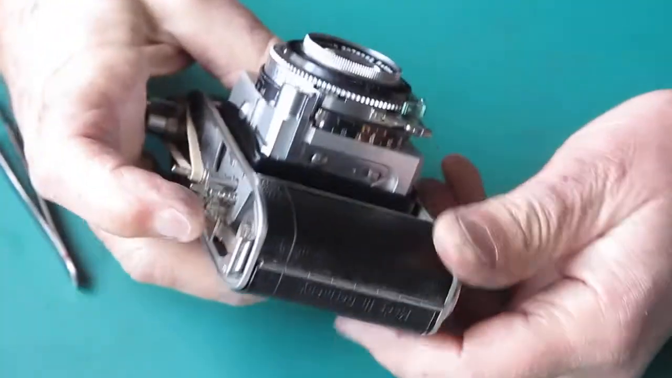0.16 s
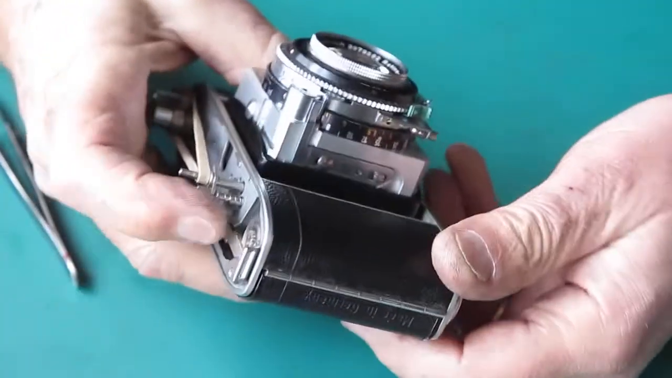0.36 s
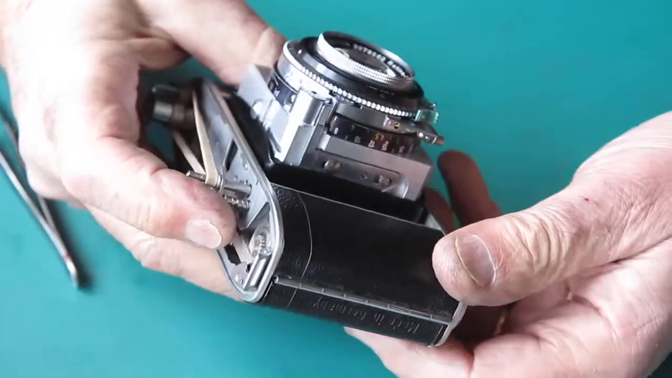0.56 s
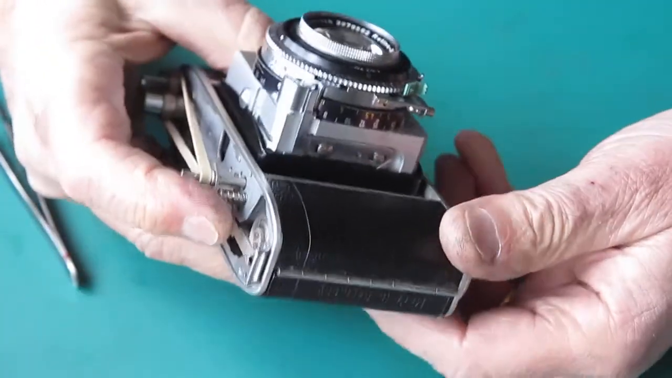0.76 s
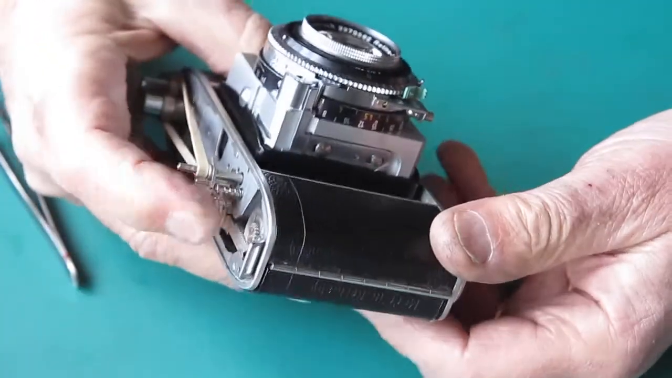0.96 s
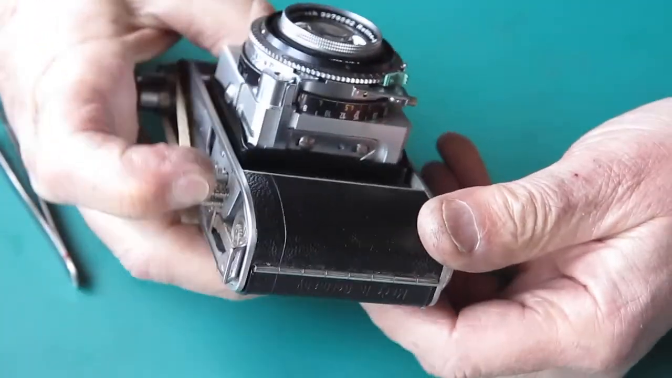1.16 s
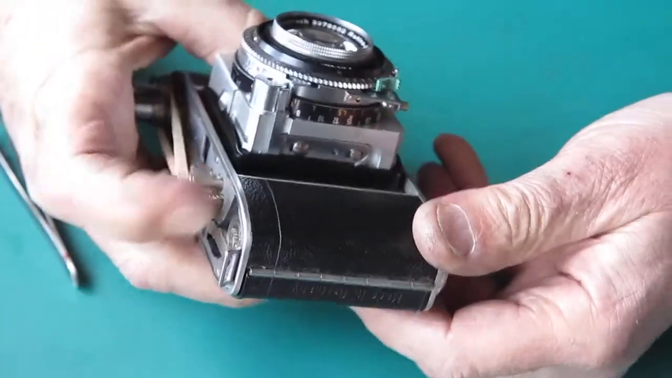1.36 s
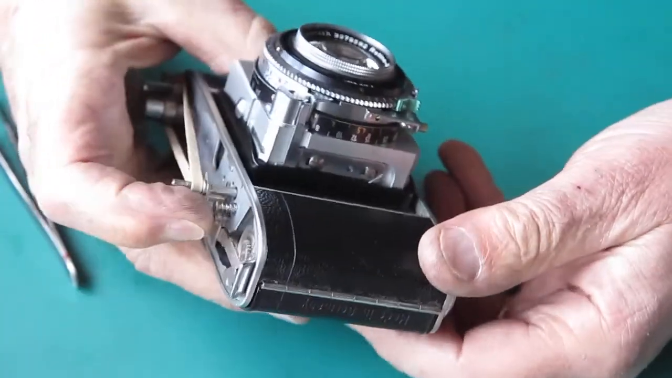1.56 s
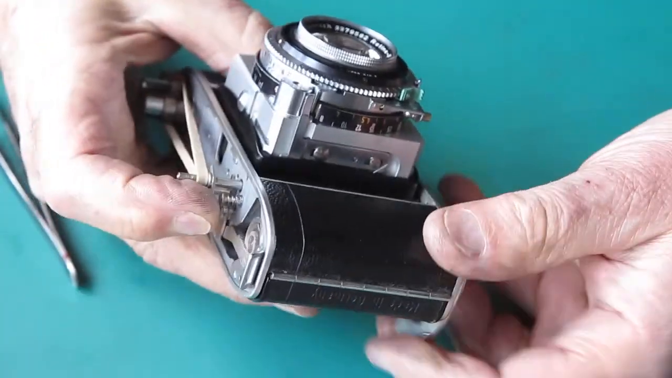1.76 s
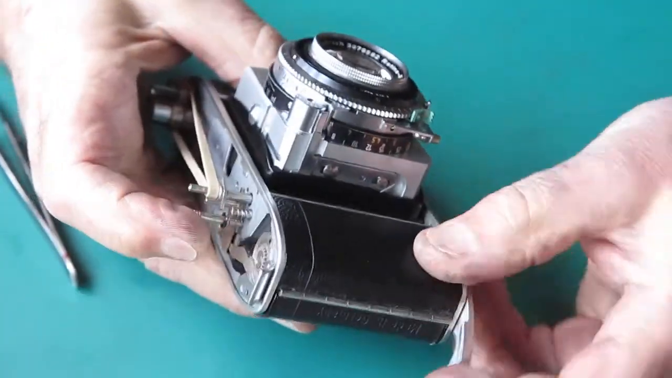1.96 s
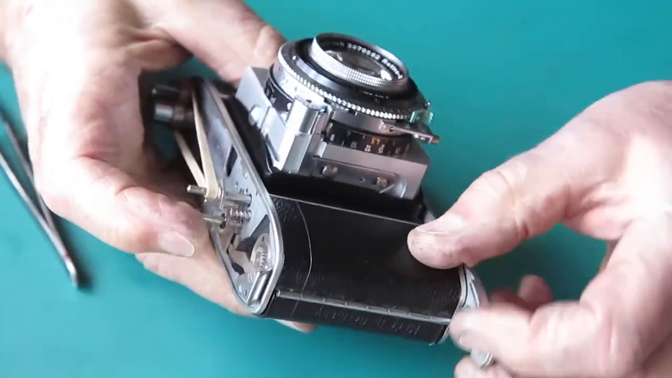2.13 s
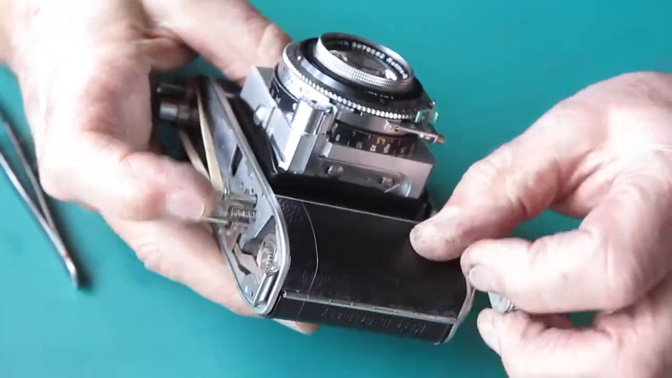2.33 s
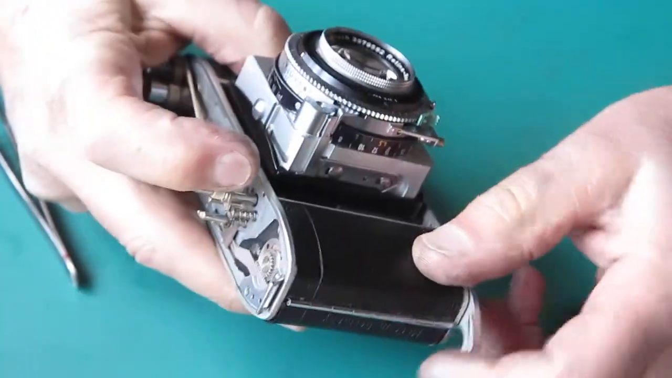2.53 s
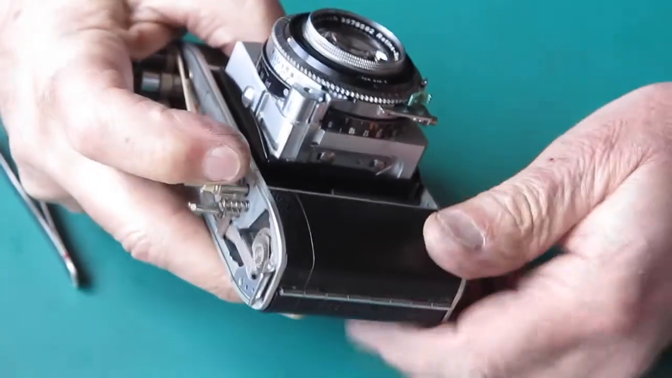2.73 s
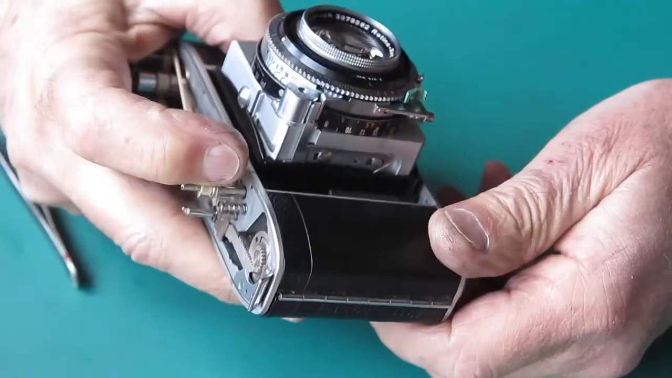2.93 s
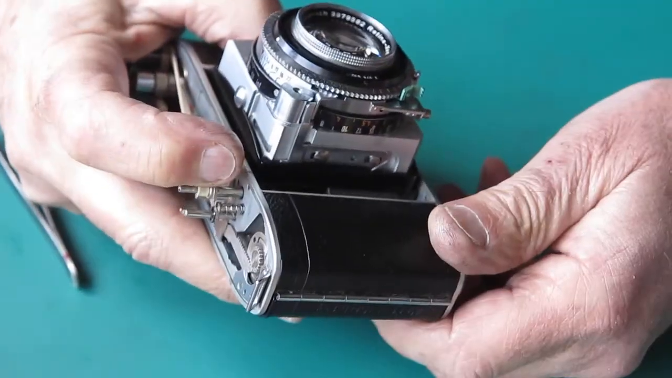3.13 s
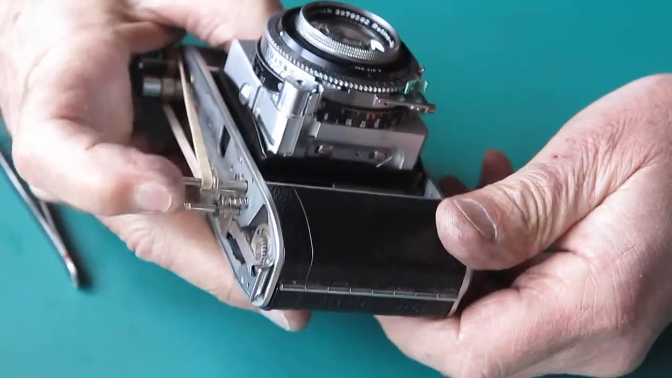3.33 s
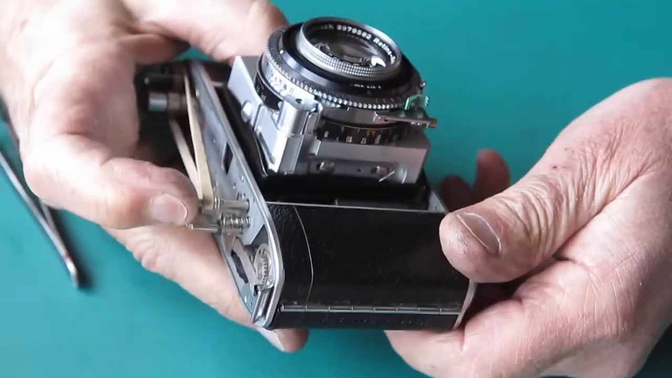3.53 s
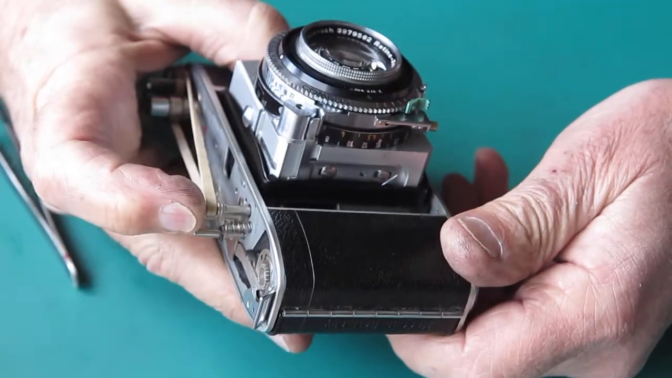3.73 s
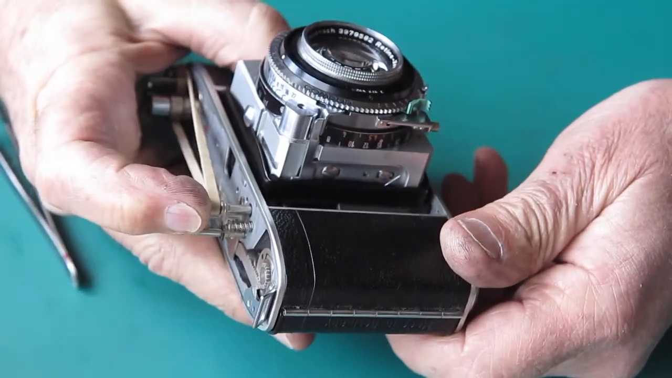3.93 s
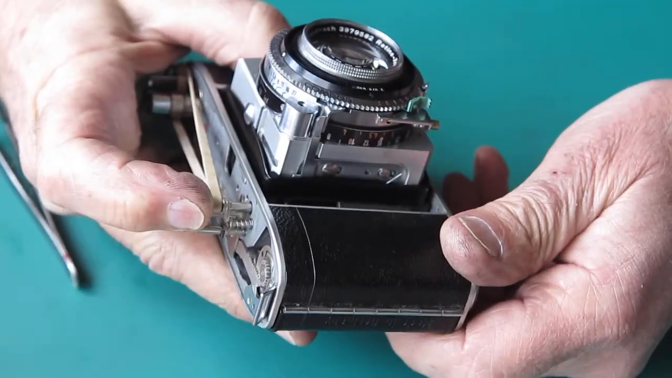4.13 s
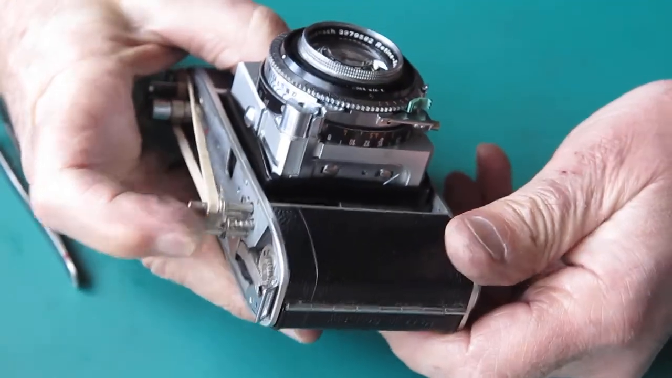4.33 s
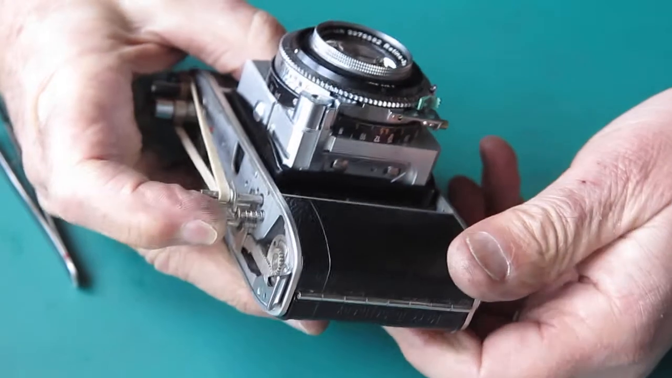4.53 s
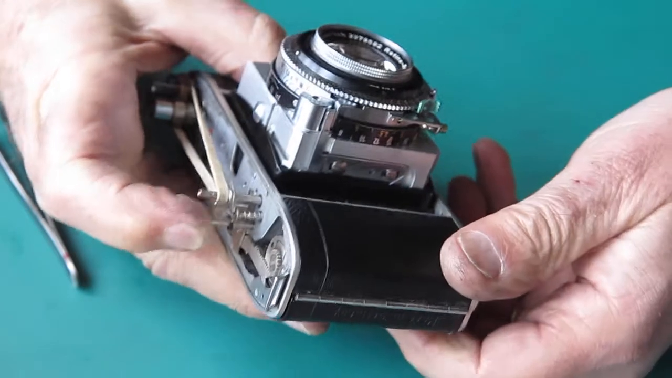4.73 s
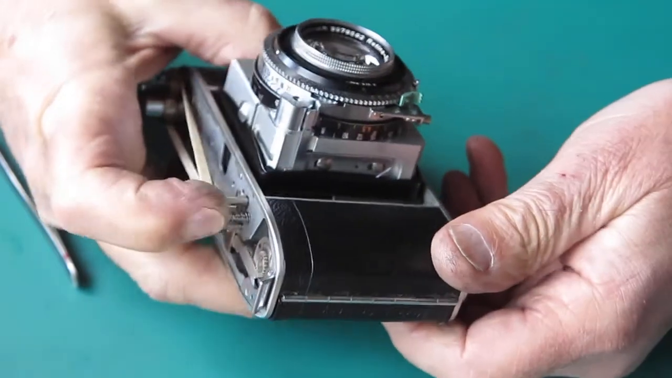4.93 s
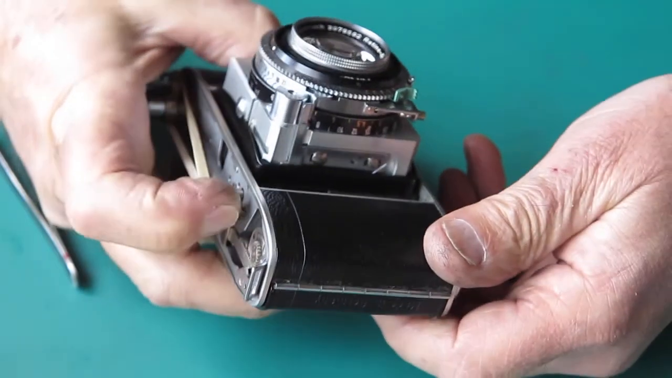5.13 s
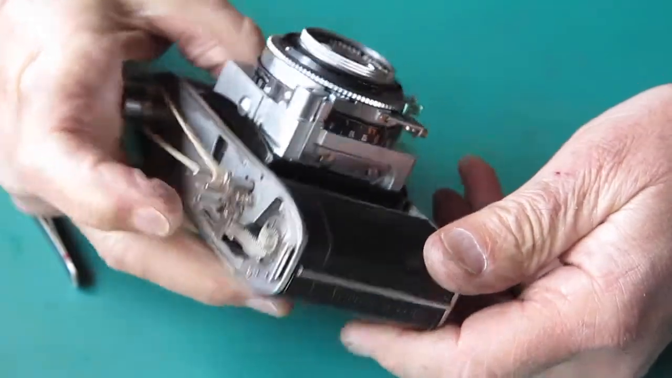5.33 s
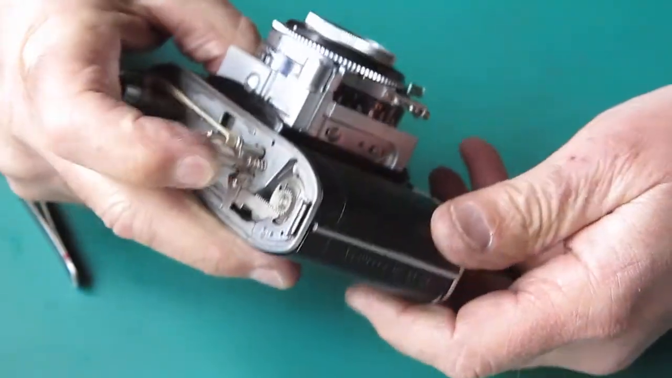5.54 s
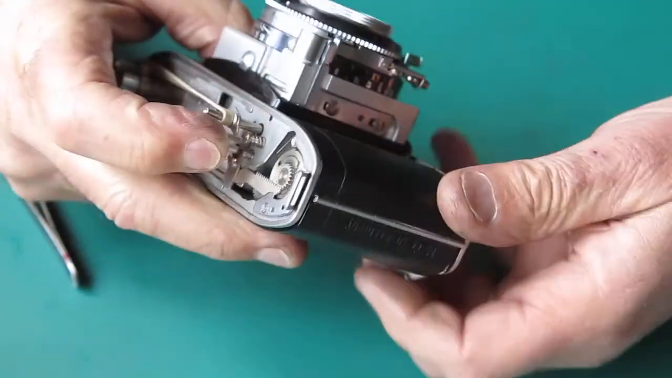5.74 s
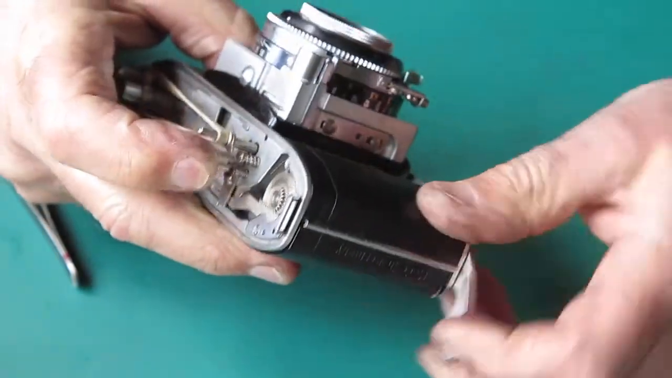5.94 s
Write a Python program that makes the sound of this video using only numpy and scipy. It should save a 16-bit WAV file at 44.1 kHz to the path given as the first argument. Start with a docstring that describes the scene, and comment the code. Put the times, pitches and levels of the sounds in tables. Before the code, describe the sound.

Small sharp metallic clicks and short ratcheting rasps as a camera's shutter and winding lever are worked by hand in a quiet room.

```python
"""A small damped room: a hand works a metal camera's release and winding lever, 0.5 m from a stereo mic. Pawls
and catches strike, bounce and ring the thin body; gears rasp while the lever turns; fingers knock the shell.
The room echoes briefly. Rumble, hum and hiss swell slowly and drop at the two loudest blows."""
import sys
import numpy as np
from scipy import signal
from scipy.fft import rfft, irfft
from scipy.io import wavfile
from scipy.ndimage import uniform_filter1d

SR = 44100
rng = np.random.default_rng(int(sys.argv[2]) if len(sys.argv) > 2 else 0)


def dump(signal):
    """Clip the signal to [-1, 1] and save it as 16-bit WAV at the path in sys.argv[1]."""
    limited = np.clip(np.atleast_2d(signal).T, -1, 1)
    pcm = np.round(limited * 32767).astype(np.int16)
    wavfile.write(sys.argv[1], SR, pcm)


N = 268791


def undb(db):
    return 10 ** (np.asarray(db) / 20)


def unit(x):
    return x / np.sqrt(np.mean(x ** 2))


def over_log_hz(points, hz):
    point_hz, values = np.transpose(points)
    return np.interp(np.log(np.maximum(hz, 1)), np.log(point_hz), values)


def over_time(points):
    return np.interp(np.arange(N) / SR, *np.transpose(points))


def band(x, hz, width_hz):
    return signal.lfilter(*signal.iirpeak(hz, hz / width_hz, fs=SR), x)


def steep_band(x, hz, width_hz):
    return band(band(x, hz, width_hz), hz, width_hz)


def smooth(x, ms):
    pole = np.exp(-1000 / (ms * SR))
    return signal.lfilter([1 - pole], [1, -pole], x)


def wander(rate_hz):
    """Random steps, slewed twice."""
    hold = int(SR / rate_hz)
    steps = np.repeat(rng.standard_normal(N // hold + 1), hold)
    return 0.7 * uniform_filter1d(uniform_filter1d(steps, hold), hold)[:N]


def add(out, at_s, x):
    i = int(at_s * SR)
    out[..., i:i + x.shape[-1]] += x[..., :N - i]


def minimum_phase(gain_db):
    """Unit-energy causal response for gains from 0 Hz to SR / 2."""
    cepstrum = irfft(gain_db * np.log(10) / 20)
    half = len(cepstrum) // 2
    cepstrum[1:half] *= 2
    cepstrum[half + 1:] = 0
    response = irfft(np.exp(rfft(cepstrum)))[:half]
    return response / np.sqrt(np.sum(response ** 2))


def air():
    """Flickering rumble and hiss, most alike left and right in the bass."""
    spectrum = [(13, -38), (22, -12.5), (132, -4), (211, -9), (278, -11), (398, -11), (554, -17),
                (910, -18), (988, -20.5), (1070, -17.5), (1710, -25), (7190, -29), (11500, -43),
                (14700, -58), (16000, -68)]  # (frequency [Hz], relative density [dB])
    balance = [(60, 1), (110, 7.5), (200, 1), (380, 1), (700, 1.5), (1290, 1.0), (2380, 0.5), (4400, 0.0),
               (8120, -1.5), (15000, 6)]  # (frequency [Hz], left minus right [dB])
    likeness = [(30, 0.92), (120, 0.71), (300, 0.033), (700, 0.067), (2000, 0.25), (6000, 0.089),
                (14000, 0.042)]  # (frequency [Hz], left-right correlation [0..1])
    rumble_boost = [(0, 1), (1.3, -3.5), (2.1, 1.5), (2.9, -1.5), (3.9, 2), (4.8, -3), (6.09, -3)]  # (time [s], gain below 140 Hz [dB])
    hz = np.fft.rfftfreq(N, 1 / SR)
    alike, pan_db = over_log_hz(likeness, hz), over_log_hz(balance, hz)
    mid, side = rfft(rng.standard_normal((2, N)))
    mid, side = mid * np.sqrt(1 + alike), side * np.sqrt(1 - alike)
    stereo = np.array([(mid + side) * undb(pan_db / 2), (mid - side) * undb(-pan_db / 2)])
    noise = unit(irfft(undb(over_log_hz(spectrum, hz)) * stereo, N))
    rumble = irfft(rfft(noise) / (1 + (hz / 140) ** 4), N)
    return noise + rumble * (undb(over_time(rumble_boost)) - 1)


def background():
    """Air, wavering hum and a thin whine; all creep up and drop at the loudest blows."""
    hum_tones = [(119.6, 16.6, -9), (149.8, 1.83, -8), (280.8, 5, -16.5)]  # (frequency [Hz], width [Hz], level re air [dB])
    drops = [(2.27, 3.5, -0.5), (3.99, 10, 4)]  # (time [s], lasting drop [dB], brief extra dip [dB])
    noise = air()
    hum = sum(undb(db) * unit(band(rng.standard_normal(N), hz, width)) for hz, width, db in hum_tones)
    whine_db = -13.5 + 1.2 * wander(9)
    whine_hz = 968.5 + .8 * wander(4)
    whine = undb(whine_db) * np.sin(2 * np.pi * np.cumsum(whine_hz) / SR)
    flicker_db = 1.5 * wander(6.52)
    t = np.arange(N) / SR
    swell_db = -60 + 4 * t
    for at_s, drop_db, dip_db in drops:
        swell_db -= (t > at_s) * (drop_db + dip_db * np.exp(-np.abs(t - at_s) / 0.086))
    return (noise * undb(flicker_db) + hum + whine) * undb(swell_db)


def knocks():
    """A finger or the lever meets the shell: a quick push, a rough dull thud."""
    contacts = [(.25, -56.5, 1480, 2400, 0.37), (1.25, -53, 1300, 1400, 0.23),
                (2.245, -35, 384, 220, 0.051), (2.257, -26.5, 888, 180, 0.026),
                (3.255, -50, 1500, 2400, 0.15), (3.991, -32, 980, 240, 0.037),
                (4.341, -49.5, 270, 130, 0.18), (5.374, -34.5, 443, 263, 0.16),
                (5.426, -53, 1800, 3000, 0.16), (5.465, -48, 600, 600, 0.2)]  # (time [s], nominal peak [dB], pitch [Hz], width [Hz], t60 [s])
    out, t = np.zeros(N), np.arange(int(.2 * SR)) / SR
    crest_db = 6.5
    for at_s, peak_db, hz, width_hz, t60_s in contacts:
        envelope = (1 - np.exp(-t / 0.00045)) * 1000. ** (-t / t60_s)
        thud = unit(steep_band(rng.standard_normal(len(t)) * envelope, hz, width_hz))
        thud *= np.sqrt(np.mean(envelope ** 2)) / envelope.max()
        add(out, at_s, undb(peak_db - crest_db) * thud)
    return out


def ticks(count, spread_db):
    """Tiny contacts of uneven size."""
    return rng.standard_normal(count) * undb(spread_db * rng.exponential(size=count))


def landing(ms, rattle_ms):
    """Contact envelope: quick rise, short decay."""
    ms = np.maximum(ms, 0)
    return (1 - np.exp(-ms / 0.27)) * np.exp(-ms / rattle_ms)


def strike(hardness_db_oct):
    """Crack of one contact; harder is brighter."""
    spectrum = [(880, -43), (1500, -9), (2300, -10), (2610, -15), (3410, -9.5), (4120, -5), (5540, -3),
                (6000, 1), (7100, 2), (9190, -4), (11400, -9.5), (12900, -19.5), (16000, -44)]  # (frequency [Hz], relative density [dB])
    hz = np.fft.rfftfreq(512, 1 / SR)
    tilt_db = hardness_db_oct * np.log2(np.clip(hz, 1000, 14000) / 6500)
    return minimum_phase(over_log_hz(spectrum, hz) + tilt_db)


def body_ring(t):
    """Modes of the thin body; level and tuning vary per blow."""
    modes = [(4240, -8, .04), (4950, -4.5, 0.04), (5480, 13, 0.038), (6200, 10.5, 0.037), (7200, 0, 0.08),
             (7700, -15, .05), (7880, 10, 0.08), (9400, -23, 0.033), (11230, -23, .04), (13000, -28, 0.028)]  # (frequency [Hz], relative level [dB], t60 [s])
    hz, db, t60_s = np.array(modes).T[:, :, None]
    scatter, detune = rng.standard_normal((2,) + hz.shape)
    tones = np.sin(2 * np.pi * hz * (1 + .025 * detune) * t)
    return np.sum(undb(db + 5 * scatter) * tones * 1000. ** (-t / t60_s), axis=0)


def shell_weight(rattle):
    """Midrange of a blow, with the shell's hollow ring."""
    mids = signal.sosfilt(signal.butter(4, (840, 2310), "bandpass", fs=SR, output="sos"), rattle)
    hollow = band(band(rattle, 980, width_hz=260), 980, width_hz=520)
    return unit(unit(mids) + 0.8 * unit(hollow))


def clicks():
    """Metal on metal: each blow rattles, bounces once, cracks in the treble and rings the body."""
    # (time [s], nominal peak [dB], weight re crack [dB], hardness [dB/octave], rattle decay [ms])
    blows = [(0.312, -44, -8, -1, 3.3), (0.397, -51.5, -20, -3, 4), (0.9613, -49, -29, -5, 6.2),
             (1.0046, -27.5, -16.5, 0, 4.8), (1.2882, -32.5, -18, -1, 3), (1.291, -23, -17, 5, 4.2),
             (1.3632, -29.5, -10.5, 2, 5.1), (1.543, -36, -11, -1, 2.5), (1.7942, -27.5, -13.5, -3, 3.5),
             (1.8576, -27.5, -10.5, -0.5, 6), (1.9672, -45, -24, 7, 3), (1.9758, -28, -34, 1, 4.9),
             (2.1163, -31.5, -13, -1.5, 8.7), (2.2474, -28, -6.5, -5, 12), (2.2641, -7, -34, 9, 1.4),
             (2.266, -7.5, -18, 2.5, 3.5), (2.296, -39, -30, 6, 6.5), (2.488, -18, -20, 6, 3.2),
             (2.58, -15.5, -19.5, 6.5, 5.2), (2.6769, -14.5, -20, 4, 3.4), (2.7468, -19, -15, 3.5, 4.5),
             (2.7548, -10, -19.5, 2, 4.3), (2.78, -20.5, -12, -4, 3.9), (2.7861, -11, -19, 5, 5.8),
             (2.7903, -12.5, -20, 2, 4.8), (2.7994, -14.5, -16, -1, 4.6), (3.9843, -17, -15, 21, 1.4),
             (3.9867, -8.5, -22, -0.5, 4.1), (3.9909, -11.5, -12, 4.5, 4), (4.021, -32, -9, 9, 4.5),
             (4.2517, -40, -5, 1, 5.2), (4.716, -36.5, -20, 2.5, 5.6), (4.7437, -27.5, -14.5, -1, 6.7),
             (5.052, -48.5, -20, -6, 5), (5.0862, -26, -17, 4, 2.3), (5.0901, -23, -16, 5, 4.3),
             (5.185, -41.5, -6, -7.5, 6), (5.1998, -27.5, -13, -0.5, 4.4), (5.2594, -43.5, -20, -9, 3.5),
             (5.3616, -46, -14, -3, 5), (5.3747, -43, -24, -9, 3.5), (5.463, -46.5, -20, -6, 4),
             (5.534, -44, -8, -3.5, 6.1), (5.5822, -40.5, -4, -2, 3.9), (5.7556, -36, -8, -3, 4.5),
             (5.8424, -44, -27, 4, 3.3), (5.8449, -26, -13.5, 1.5, 5.8), (5.911, -20.5, -24, 1.5, 4.5),
             (5.9628, -20.5, -35, 3, 4.9), (5.984, -25.5, -15.5, 0, 3.8), (6.0609, -28, -16, 0, 4.5)]
    bounce_ms, bounce_db, ring_db, crest_db = 9.7, -12, -11, 8
    out, t = np.zeros((2, N)), np.arange(int(.08 * SR)) / SR
    for at_s, peak_db, weight_db, hardness_db_oct, rattle_ms in blows + pawl_drops():
        bounce = undb(bounce_db) * landing(1000 * t - bounce_ms, rattle_ms)
        envelope = landing(1000 * t, rattle_ms) + bounce
        pan_db = -2 + rng.standard_normal()  # left minus right
        rattle, left, right = (ticks(len(t), spread_db=1.2) * envelope for _ in range(3))
        rattle[int(.0004 * SR)] += np.abs(rattle).max()  # first contact
        at_ports = rattle + 0.4 * np.array([left, right])  # a separate path to each mic port
        crack = unit(signal.fftconvolve(at_ports, strike(hardness_db_oct)[None], axes=1)[:, :len(t)])
        ring = unit(signal.fftconvolve(rattle, body_ring(t))[:len(t)])
        blow = crack + undb(ring_db) * ring + undb(weight_db) * shell_weight(rattle)
        blow *= undb(peak_db - crest_db) * np.sqrt(np.mean(envelope ** 2)) / envelope.max()
        add(out, at_s, blow * undb([[pan_db / 2], [-pan_db / 2]]))
    return out


def winding():
    """Gear teeth slip past the pawl in a dense uneven rasp."""
    strokes = [
        [(1.68, -76), (1.764, -55.5), (1.89, -60), (1.958, -59), (2.186, -57.5), (2.25, -46)],
        [(5.74, -66), (5.814, -57), (5.936, -60), (6.01, -51), (6.09, -45.5)],
    ]  # one list per lever stroke: (time [s], level [dB])
    teeth_per_s = 2000
    teeth = ticks(N, spread_db=2.5) * (rng.random(N) < teeth_per_s / SR)
    rasp = unit(signal.fftconvolve(teeth, strike(hardness_db_oct=-1.7))[:N])
    t = np.arange(N) / SR
    turning = sum((t > stroke[0][0]) & (t < stroke[-1][0] + .01) for stroke in strokes)
    return rasp * undb(over_time(np.concatenate(strokes))) * turning


def pawl_drops():
    """The pawl falls over the ratchet: faint, dull, roughly even blows, as rows for clicks()."""
    strokes = [(1.697, 2.24, 40, -38), (5.777, 6.09, 62, -33.5)]  # (start [s], end [s], drop rate [1/s], nominal peak [dB])
    weight_db, hardness_db_oct, rattle_ms = -22, -2.5, 2.2
    rows = []
    for start_s, end_s, rate_hz, peak_db in strokes:
        jitter, scatter = rng.standard_normal((64, 2)).T
        times_s = start_s + (np.arange(64) + .15 * jitter) / rate_hz
        rows += [(at_s, db, weight_db, hardness_db_oct, rattle_ms)
                 for at_s, db in zip(times_s, peak_db + 2 * scatter) if at_s < end_s]
    return rows


def room(x):
    """Dense echoes: each narrow band's power builds up, then dies away as noise."""
    decay = [(980, 0.29, -1.5), (3030, 0.27, 8), (5600, 0.28, 1), (6900, 0.23, -0.5), (10000, 0.15, -0.5),
             (12100, 0.16, -4.5), (15000, 0.16, -3)]  # (frequency [Hz], t60 [s], relative level [dB])
    decay_hz, t60_s, db = np.transpose(decay)
    common, left, right = rng.standard_normal((3, N))
    noise = common + np.array([left, right])
    tail, build_ms = 0, 11
    for hz in 400 * 2 ** (np.arange(32) / 6):
        fade_ms = 1000 * np.interp(hz, decay_hz, t60_s) / np.log(1e6)
        power = smooth(smooth(steep_band(x, hz, hz / 6) ** 2, fade_ms), build_ms)
        tail += undb(np.interp(hz, decay_hz, db)) * np.sqrt(power) * unit(steep_band(noise, hz, hz / 4))
    port_resonance = undb(6) * band(tail, 7130, width_hz=700)
    return undb(-5) * (tail + port_resonance)


def mic_ports(hz):
    """Left and right response: the ports favour different treble bands and differ in phase."""
    balance = [(2000, 3), (4000, 0.5), (6000, -3), (7300, -13.5), (8600, 1), (10000, 9.5), (12000, 18),
               (15000, 8)]  # (frequency [Hz], left minus right [dB])
    phase = [(0, 0), (4820, -0.13), (5510, 1.5), (6200, 0.78), (7410, 1.3), (7840, -2.5), (8350, -5.0),
             (9730, -4), (11500, -6), (13600, -8.5)]  # (frequency [Hz], left lead [rad])
    pan_db, lead_rad = over_log_hz(balance, hz), over_log_hz(phase, hz)
    gain = np.sqrt(2 / (1 + undb([-2 * pan_db, 2 * pan_db])))
    return gain * np.exp(.5j * np.array([lead_rad, -lead_rad]))


def scene():
    """Camera and echoes through the mic ports, over the background."""
    camera = clicks() + winding() + knocks()
    hz = np.fft.rfftfreq(N, 1 / SR)
    echoes = rfft(room(camera)) / (1 + (hz / 12500) ** 12)  # duller than the direct clicks
    return irfft((rfft(camera) + echoes) * mic_ports(hz), N) + background()


def record(dry):
    """The recorder rounds the loudest peaks and cuts the top steeply."""
    ceiling, top_hz = .65, 16300
    lowpass = signal.ellip(12, .2, 95, top_hz, fs=SR, output="sos")
    return signal.sosfilt(lowpass, ceiling * np.tanh(dry / ceiling))


dry = scene()
out = record(dry)
dump(out)
```